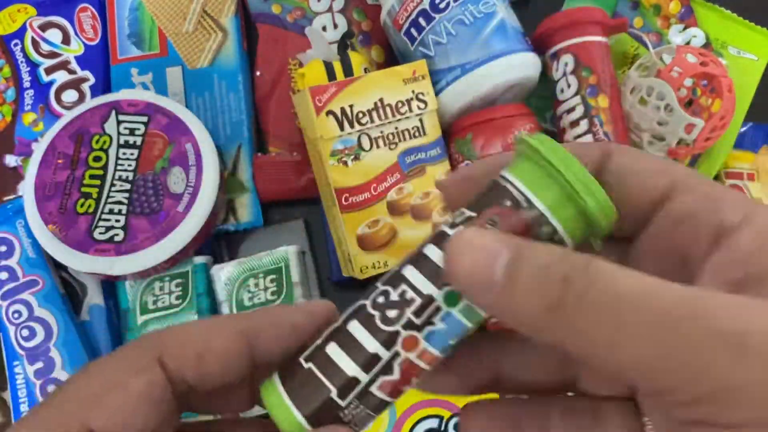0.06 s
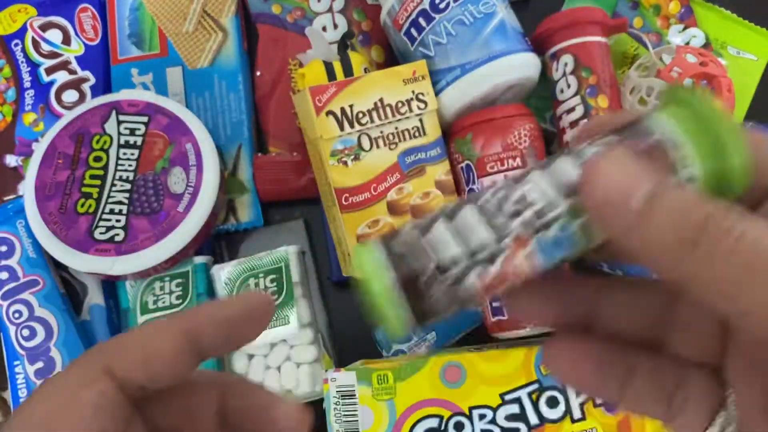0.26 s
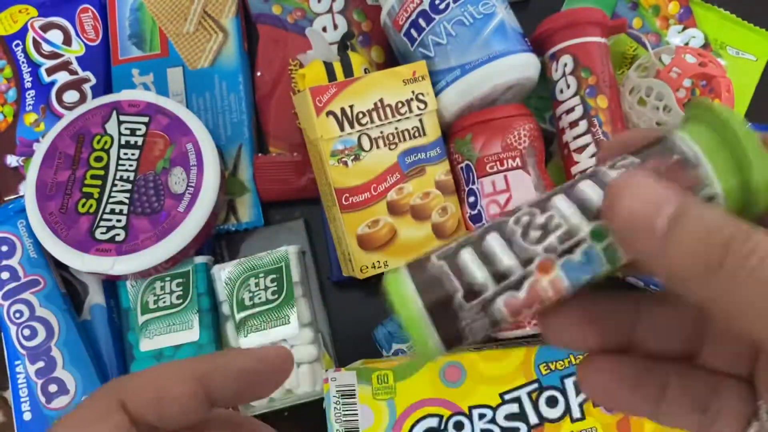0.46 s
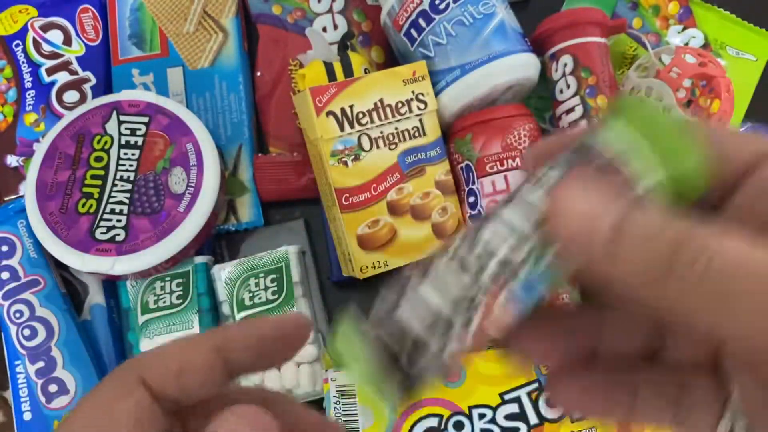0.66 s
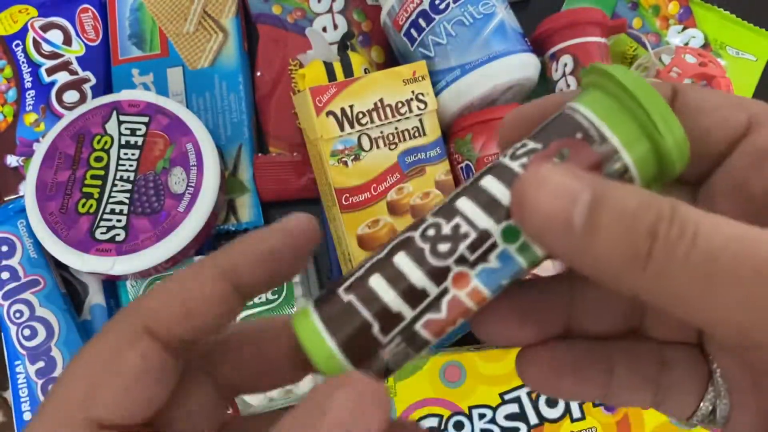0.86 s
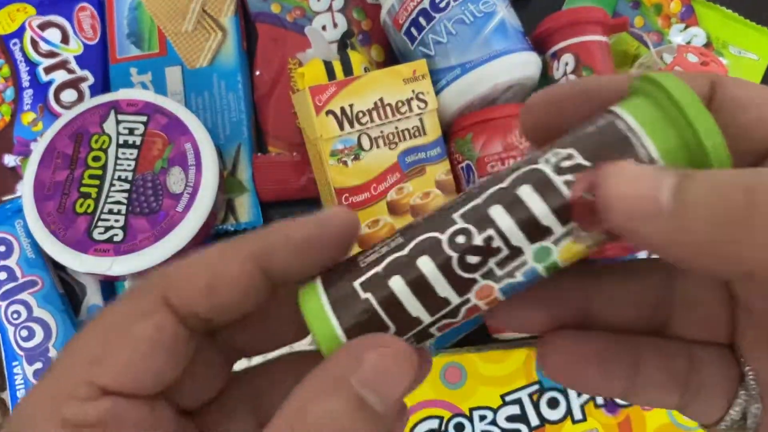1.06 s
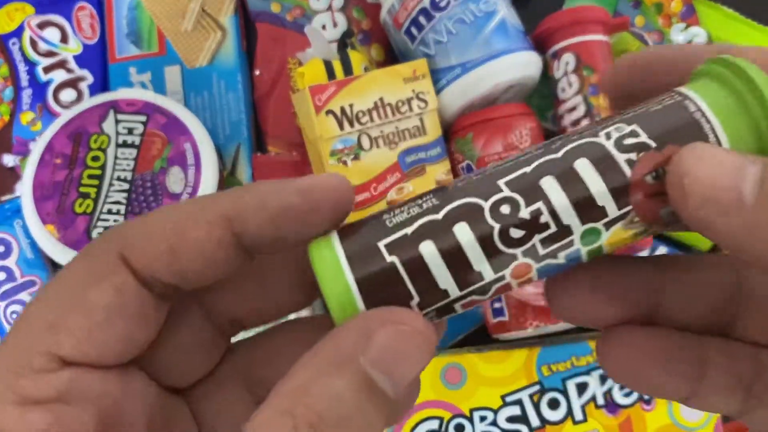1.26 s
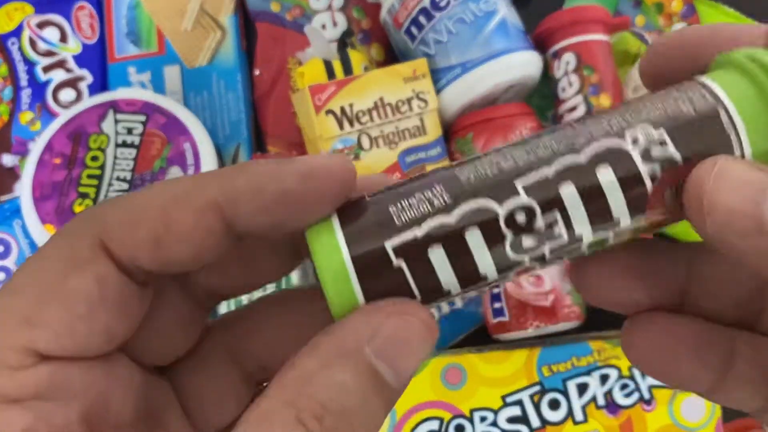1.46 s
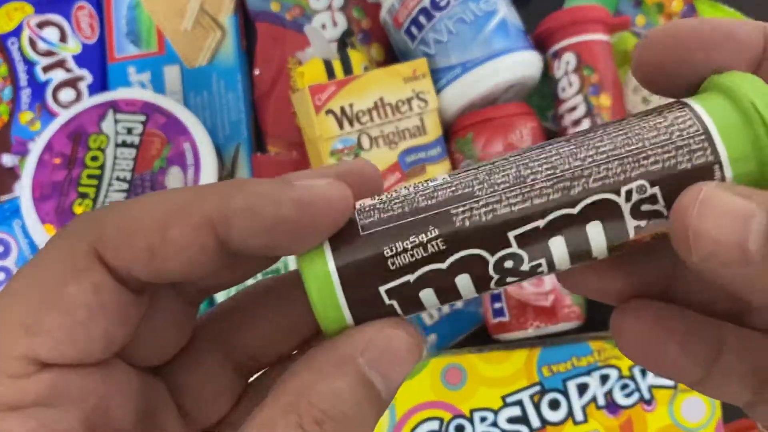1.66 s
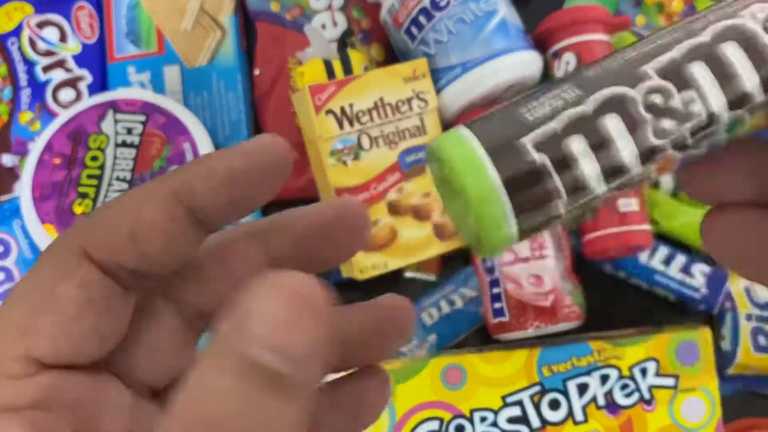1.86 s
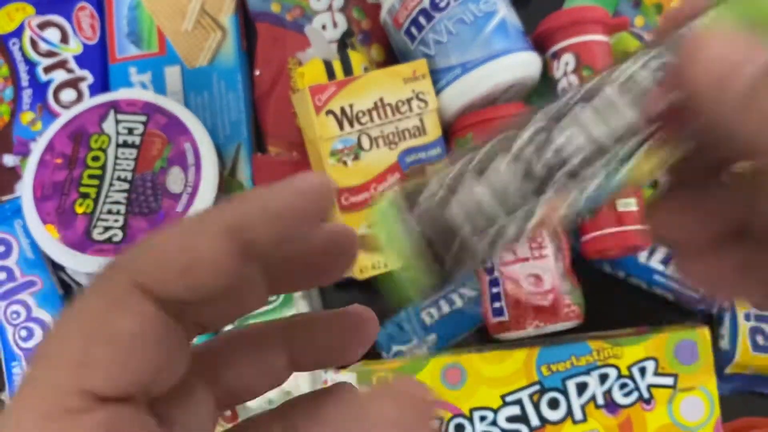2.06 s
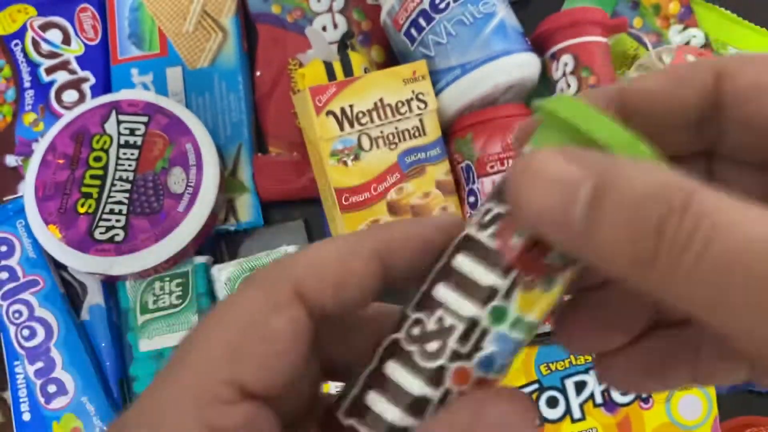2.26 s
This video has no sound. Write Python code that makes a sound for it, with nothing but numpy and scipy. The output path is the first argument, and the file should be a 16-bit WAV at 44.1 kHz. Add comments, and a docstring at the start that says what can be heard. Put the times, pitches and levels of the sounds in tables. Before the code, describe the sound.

Hard candies clatter sharply inside a plastic tube, shaken twice over with a pause between.

```python
"""Small hard candies are shaken in a capped plastic tube, in two bouts, close to a two-port microphone.
Each stroke throws a handful against one end: every candy makes a sharp crack and a hollow knock,
the cap gives a dull thock, and the other candies jostle in behind.
Between the bouts, fingers turn the tube with faint ticks and rubbing.
A small room rings over a low hum."""
import sys
import numpy as np
from scipy import signal
from scipy.fft import rfft, irfft
from scipy.io import wavfile
from scipy.ndimage import uniform_filter1d

SR = 44100
rng = np.random.default_rng(int(sys.argv[2]) if len(sys.argv) > 2 else 0)


def output_pcm(signal):
    """Save a mono or channel-first signal as 16-bit PCM at the path in sys.argv[1].

    Samples are clipped to [-1, 1] before scaling.
    """
    pcm = np.clip(np.atleast_2d(signal).T, -1, 1) * 32767
    wavfile.write(sys.argv[1], SR, np.round(pcm).astype(np.int16))


N = 105840
HIT_SAMPLES = 1024

# Each stroke's loose candies and the tone of the spot they land on (time [s], length [s], knock [dB],
# crack [dB], cap thock [dB], hollow pitch [Hz], ping pitch [Hz], bass cut of the crack [Hz])
STROKES = [(.249, .018, -34.5, -38, -44, 2160, 5440, 550),
           (.325, .007, -37, -34.5, -42.5, 2120, 4900, 1200),
           (.346, .008, -34, -39.5, -56, 2400, 5420, 1100), (0.433, .02, -39, -38, -44.5, 2280, 5200, 1250),
           (0.502, .021, -45.5, -43.5, -53.5, 2480, 4810, 550),
           (0.595, .017, -33.5, -32, -47.5, 2170, 4500, 800),
           (0.665, .023, -43.5, -38, -52.5, 2202, 3344, 739),
           (1.84, 0.0071, -27.5, -28.5, -42, 2100, 3700, 400),
           (1.909, .02, -48, -37.5, -41.5, 2083, 4530, 400),
           (2.013, .018, -33.5, -33, -43, 2227, 3385, 620),
           (2.079, .027, -38.5, -35, -40, 2307, 4420, 1900),
           (2.206, .0098, -43.5, -55, -48, 2250, 4900, 400)]
# Tone of a candy's crack (frequency [Hz], relative level [dB])
CRACK_TONE = [(150, -24), (300, -21.5), (600, -13), (1100, -5.5), (2200, 0), (3400, 0), (4600, -2.5),
              (5600, -2.5), (6600, -6), (8500, -5), (11000, -11.5), (13200, -17), (15600, -21.5)]


def undb(db):
    """Turn decibels into a gain."""
    return 10 ** (np.asarray(db) / 20)


def unit(x):
    """Scale a sound to a total energy of 1."""
    return x / np.sqrt(np.sum(x ** 2, axis=-1, keepdims=True) + 1e-18)


def fade(t, ring_s):
    """A fade that falls 60 dB in ring_s seconds."""
    return np.exp(-np.log(1000) * t / ring_s)


def cut_bass(x, hz):
    """Weaken everything below hz, then scale to an energy of 1."""
    return unit(signal.lfilter(*signal.butter(2, hz, "high", fs=SR), x))


def colour(x, tone):
    """Shape a sound's tone along (frequency [Hz], level [dB]) points."""
    size = x.shape[-1]
    hz, db = np.array(tone).T
    f = np.maximum(np.fft.rfftfreq(size, 1 / SR), 1)
    gain = undb(np.interp(np.log(f), np.log(hz), db))
    cepstrum = irfft(np.log(gain), size)
    # Folding this in half makes the filter ring after a hit, not before it.
    cepstrum[1:size // 2] *= 2
    cepstrum[size // 2 + 1:] = 0
    return irfft(rfft(x) * np.exp(rfft(cepstrum)), size)


def noise(tone, width):
    """Stereo noise with the given tone and an average power of 1."""
    middle, side = colour(rng.standard_normal((2, N)), tone)
    return unit(middle + width * side * np.array([[1], [-1]])) * np.sqrt(N)


def wander(rate_hz):
    """A random drift, roughly between -1 and 1."""
    step = int(SR / rate_hz)
    return uniform_filter1d(np.repeat(rng.standard_normal(N // step + 1), step), step)[:N]


def add(out, start_s, sound):
    """Mix one hit in at its start time."""
    i = int(np.clip(start_s * SR, 0, N - 1))
    out[:, i:i + HIT_SAMPLES] += sound[..., :N - i]


def impact(knock_db, crack_db, tone, hollow_hz, ping_hz, cut_hz, ping_ring_s=0.015):
    """One contact: a hollow knock of the tube, plus a gritty crack with a brief ping."""
    # Hollow notes of the tube and cap (pitch [times hollow_hz], relative level [dB], ring time [s])
    modes = [(.62, -13.5, 0.013), (1, 2.5, 0.0068), (1.15, 4, 0.0055)]
    t = np.arange(HIT_SAMPLES) / SR
    multiple, db, ring_s = np.array(modes).T[:, :, None]
    strength, detune = rng.standard_normal((2, len(modes), 1))  # no two hits are alike
    note_hz = hollow_hz * multiple * (1 + 0.038 * detune)
    notes = undb(db + 5 * strength) * np.sin(2 * np.pi * note_hz * t) * fade(t, ring_s)
    knock = notes.sum(axis=0) * (1 - np.exp(-t / 0.0002))
    knock = cut_bass(knock, 460 + cut_hz)  # the knock carries no bass

    rise = 1 - np.exp(-t / 0.0001)
    grit = rng.standard_normal(HIT_SAMPLES) * np.exp(-t / 0.00085) * rise
    click = np.roll(t == 0, 10)
    snap = cut_bass(colour(click + grit, tone), cut_hz)
    own_hz = ping_hz * 2 ** (0.17 * rng.standard_normal())
    ping = unit(np.sin(2 * np.pi * own_hz * t) * fade(t, ping_ring_s) * rise)
    pan = undb(4.5 * rng.standard_normal() * np.array([[.5], [-.5]]))
    crack = unit(snap + undb(-4) * ping) * pan
    level_span_s = 0.002  # levels count a hit's energy as if spread over this time
    return (undb(knock_db - 0.5) * knock + undb(crack_db + 1) * crack) * np.sqrt(level_span_s * SR)


def hum():
    """Three low tones waver; the lower two also sink and swell."""
    # Tones of the hum (pitch [Hz], base level [dB])
    tones = [(57, -60), (113, -52), (226.5, -61)]
    # Slow swell (time [s], change of the lowest tone [dB], change of the middle tone [dB])
    swell = [(0, 2, 1.5), (.8, -1.5, -3.5), (1.3, 4, -1.5), (1.681, 11, 2.5), (2.4, -3, -1)]
    t = np.arange(N) / SR
    low, middle, high = [
        undb(db + 1.5 * wander(7.5)) * np.sin(2 * np.pi * hz * t + 0.43 * wander(9.1))
        for hz, db in tones]
    times, low_db, middle_db = np.array(swell).T
    return low * undb(np.interp(t, times, low_db)) + middle * undb(np.interp(t, times, middle_db)) + high


def room_air():
    """The air of the room makes a steady low rush."""
    # Tone of the rush (frequency [Hz], relative level [dB])
    air_tone = [(20, -24.5), (40, -8.5), (58, -6), (80, -0.5), (110, -6.5), (160, -7.5), (240, -9),
                (330, -16), (500, -21), (1200, -28.5), (2500, -39.5), (5000, -47.5), (16000, -55.5)]
    return undb(-58) * noise(air_tone, width=0.71)


def finger_rubs():
    """Fingers slide on the plastic with a grainy hiss."""
    # Each rub (time [s], length [s], level [dB])
    rubs = [(0.099, 0.085, -68.5), (1.388, .12, -68.5), (1.519, 0.29, -71.5), (2.23, 0.027, -53)]
    # Tone of the rubbing (frequency [Hz], relative level [dB])
    rub_tone = [(300, -16.5), (2500, 1), (4700, 1.5), (6500, -6.5), (10500, -8.5), (15000, -21.5)]
    t = np.arange(N) / SR
    pressure = sum(undb(db) * ((t >= start) & (t < start + length)) for start, length, db in rubs)
    grain = undb(4.8 * wander(120))
    return uniform_filter1d(pressure, size=900) * grain * noise(rub_tone, width=0.33)


def finger_ticks():
    """Fingernails tick on the tube; the grip cuts each ping short."""
    # Each tick (time [s], relative knock level [dB], relative crack level [dB])
    ticks = [(0.1053, -59.5, -57), (0.15, -57, -55.5), (0.1591, -48.5, -53), (0.2094, -51.5, -47),
             (0.768, -60, -56), (0.9568, -67.5, -66.5), (1.4504, -57, -55), (1.4629, -53, -44.5),
             (1.4769, -49, -51), (1.486, -48.5, -68), (1.5, -44.5, -61), (1.5227, -50.5, -55.5),
             (1.541, -57, -47), (1.557, -53.5, -49.5), (1.5659, -52.5, -50.5), (1.577, -41.5, -35),
             (1.608, -38.5, -52), (1.6115, -58, -40), (1.6173, -52, -43), (1.6226, -42.5, -53),
             (1.7495, -42.5, -58)]
    # Tone of a fingernail tick (frequency [Hz], relative level [dB])
    nail_tone = [(150, -26.5), (700, -4), (2000, 2), (4300, 1.5), (7000, -8), (10800, -4.5), (15600, -17.5)]
    out = np.zeros((2, N))
    for start, knock_db, crack_db in ticks:
        tick = impact(knock_db + 1.5, crack_db + 1.5, nail_tone,
                      hollow_hz=2250, ping_hz=4114, cut_hz=800, ping_ring_s=0.0047)
        add(out, start, tick)
    return out


def candy_hits():
    """The leading candies strike the tube's ends, each with the tone of the nearest stroke."""
    # Each hit (time [s], relative knock level [dB], relative crack level [dB])
    hits = [(0.2269, -25, -32), (0.2314, -29, -41), (0.2365, -24.5, -28.5), (0.2406, -25, -34),
            (0.2486, -15, -25.5), (0.251, -25, -28.5), (0.2519, -30, -30), (0.2573, -26, -26.5),
            (0.262, -29, -35), (0.3095, -42.5, -35), (0.3248, -26.5, -23.5), (0.3269, -25, -28),
            (0.3291, -23.5, -22), (0.3342, -24.5, -34), (0.3442, -18.5, -19), (0.3467, -21, -25),
            (0.3511, -27, -29), (0.4177, -39, -36), (0.4321, -9.5, -17), (0.434, -11.5, -21.5),
            (0.4352, -10.5, -19.5), (0.438, -11, -19.5), (0.443, -24.5, -25.5), (0.449, -25, -28.5),
            (0.5037, -32, -32.5), (0.5116, -20.5, -22), (0.5157, -30.5, -29), (0.5222, -25, -21.5),
            (0.5245, -27.5, -25.5), (0.5892, -12, -18.5), (0.5913, -10, -16.5), (0.5942, -12, -18.5),
            (0.5976, -19.5, -24.5), (0.602, -16.5, -19), (0.605, -23, -22), (0.6524, -34.5, -35),
            (0.6667, -38.5, -32), (0.6708, -30, -33.5), (0.6783, -33, -32), (0.6837, -29, -30),
            (0.6945, -39, -51), (0.8075, -29.5, -36), (0.8479, -50, -39.5), (0.8496, -34, -48.5),
            (1.8076, -31.5, -47.5), (1.8275, -27, -28.5), (1.8437, -19.5, -19), (1.8468, -15, -18),
            (1.9097, -32.5, -29), (1.9143, -25.5, -19.5), (1.9187, -20, -23.5), (1.922, -22.5, -19.5),
            (1.9247, -26.5, -27), (1.9313, -33.5, -20.5), (2.0043, -13, -21.5), (2.009, -10, -20.5),
            (2.0151, -20.5, -26.5), (2.018, -23, -26.5), (2.0196, -19, -20.5), (2.0706, -27, -27.5),
            (2.0774, -23, -18), (2.0813, -18, -15), (2.0907, -26.5, -21.5), (2.094, -27.5, -22.5),
            (2.2016, -26, -37.5), (2.208, -35.5, -28.5), (2.21, -36, -37), (2.2417, -46.5, -42),
            (2.2672, -49, -41), (2.2915, -38.5, -36.5)]
    out = np.zeros((2, N))
    for start, knock_db, crack_db in hits:
        *_, hollow_hz, ping_hz, cut_hz = min(STROKES, key=lambda stroke: abs(stroke[0] - start))
        add(out, start, impact(knock_db, crack_db, CRACK_TONE, hollow_hz, ping_hz, cut_hz))
    return out


def cap_thocks():
    """The weight of each handful gives a dull thock in the cap, which the hand damps."""
    # Tone of the thock (frequency [Hz], relative level [dB])
    thock_tone = [(100, -25.5), (230, -10), (380, 0), (520, -1.5), (800, 5), (1300, -7.5), (2600, -31)]
    t = np.arange(N) / SR
    push, decay_s = np.zeros(N), 0.017
    for start, length, _, _, db, *_ in STROKES:
        fading_s = np.maximum(t - start - length / 2, 0)
        push += undb(db) * (t >= start) * np.exp(-fading_s / decay_s)
    return uniform_filter1d(push, size=130) * noise(thock_tone, width=0.35)


def candy_jostle(hits_per_stroke):
    """The rest of the handful piles in as small hits that die away."""
    out = np.zeros((2, N))
    scatter_db, settle_s = 3.5, 0.007
    for start, length, knock_db, crack_db, _, *spot_hz in STROKES:
        span = length + 4 * settle_s
        for k in range(hits_per_stroke):
            delay = span * (k + rng.random()) / hits_per_stroke
            knock_change, crack_change = scatter_db * rng.standard_normal(2)
            hit = impact(knock_db + knock_change, crack_db + crack_change, CRACK_TONE, *spot_hz)
            settling = np.exp(-max(delay - length, 0) / settle_s)
            add(out, start + delay, hit * settling)
    return out


def ringing(shaken, handled):
    """The tube wall and table top ring briefly; the room echoes longer, losing its treble first."""
    # Tone of the ringing wall and the echo (frequency [Hz], relative level [dB])
    ring_tone = [(150, -28.5), (1000, -2.5), (1900, -8.5), (2550, -7.5), (3600, -6.5), (8000, -3.5),
                 (15000, -5)]
    t = np.arange(N) / SR
    wall = unit(noise(ring_tone, width=0.15) * fade(t, ring_s=0.055) * (1 - np.exp(-t / 0.0012)))
    tail = noise(ring_tone, width=0.46)
    low = signal.sosfilt(signal.butter(2, 3500, fs=SR, output="sos"), tail)
    high = signal.sosfilt(signal.butter(2, 3500, "high", fs=SR, output="sos"), tail)
    room = low * fade(t, ring_s=0.49) - high * fade(t, ring_s=0.35)
    room = unit(room * (1 - np.exp(-t / 0.0033)))
    gripped = undb(-2.5) * handled  # the gripping fingers damp the wall
    wall_ring = signal.fftconvolve(shaken + gripped, wall, axes=1)[:, :N]
    room_echo = signal.fftconvolve(shaken + handled, room, axes=1)[:, :N]
    return undb(-10) * wall_ring + undb(-18.5) * room_echo


def scene():
    """Mix the background, the fingers, the candies and their ringing."""
    background = hum() + room_air()
    handled = finger_ticks() + finger_rubs()
    shaken = cap_thocks() + candy_hits() + candy_jostle(hits_per_stroke=22)
    return background + handled + shaken + ringing(shaken, handled)


def record(dry):
    """The microphone's two ports (openings) hear the treble out of step and at slightly unequal levels."""
    # How far the left port runs ahead of the right (frequency [Hz], lead [radians])
    port_lead = [(0, 0), (1700, -.2), (2300, .1), (2800, .6), (3800, .3), (6700, 0), (8500, -3.2),
                 (16000, -15.4)]
    # How much louder the left port is than the right (frequency [Hz], level [dB])
    port_balance = [(60, 1), (600, 2.5), (1200, 1.1), (2400, 1.67), (4400, 3), (8000, 0.6), (15000, -0.7)]
    f = np.fft.rfftfreq(N, 1 / SR)
    lead = np.interp(f, *np.array(port_lead).T)
    left_db = np.interp(f, *np.array(port_balance).T)
    response = np.array([np.exp(1j * lead) * undb(left_db / 2), undb(-left_db / 2)])
    ports = irfft(rfft(dry) * response, N)
    ceiling, top_hz = 0.8, 15900  # peaks are rounded off and the highest treble is cut
    rounded = ports / (1 + (ports / ceiling) ** 6) ** (1 / 6)
    return signal.sosfilt(signal.ellip(8, .2, 70, top_hz, fs=SR, output="sos"), rounded)


dry = scene()
out = record(dry)
output_pcm(out)
```